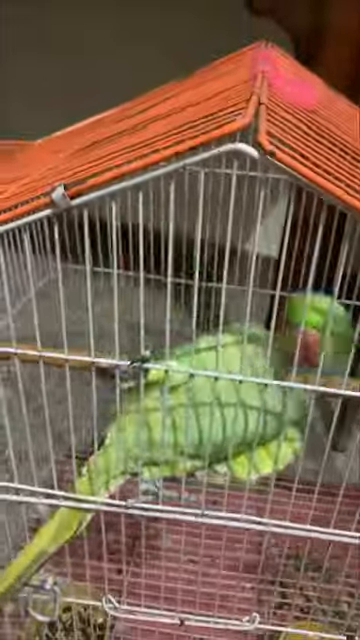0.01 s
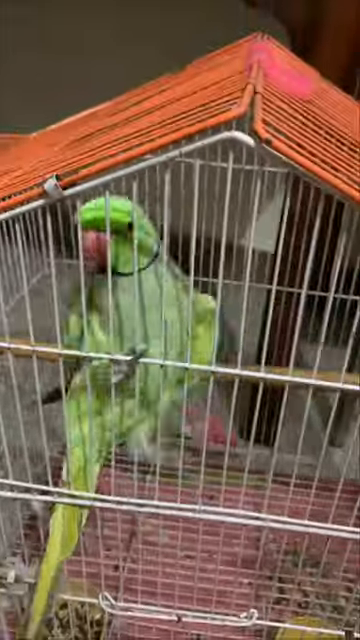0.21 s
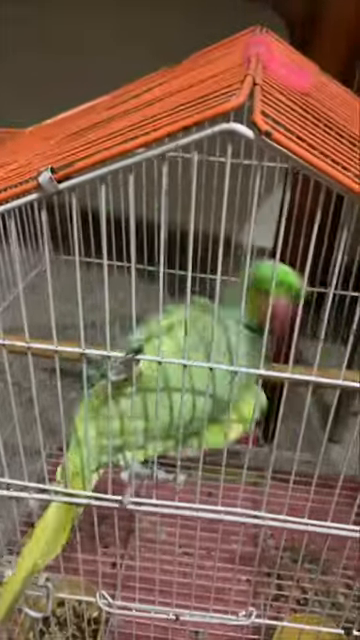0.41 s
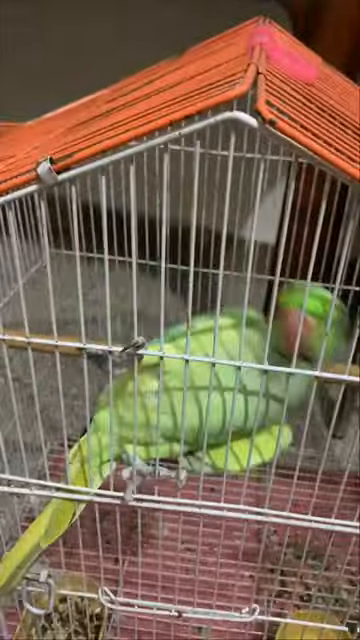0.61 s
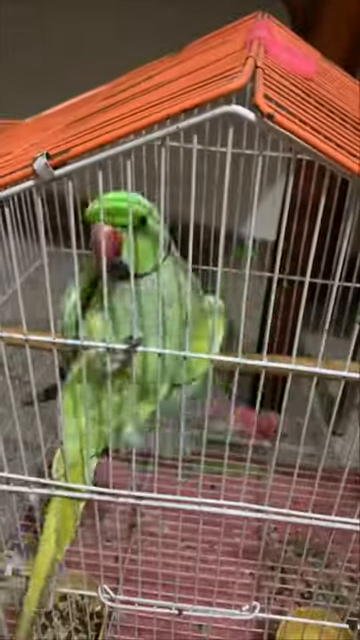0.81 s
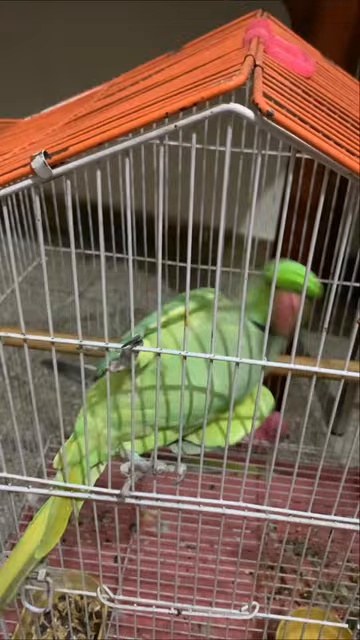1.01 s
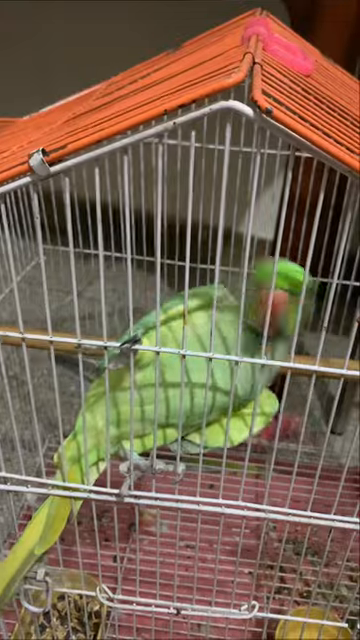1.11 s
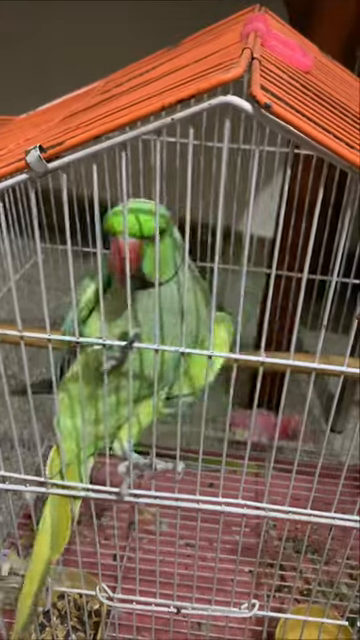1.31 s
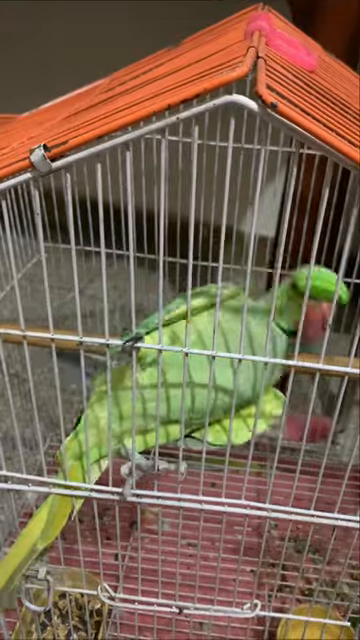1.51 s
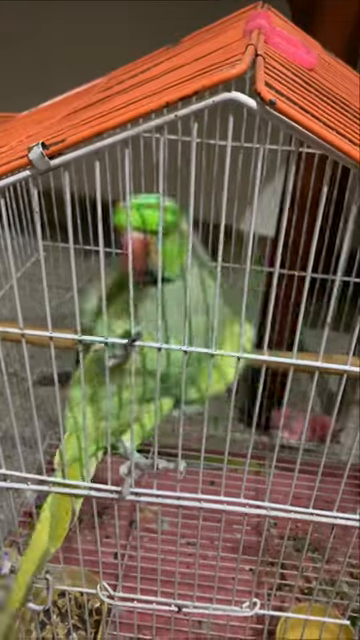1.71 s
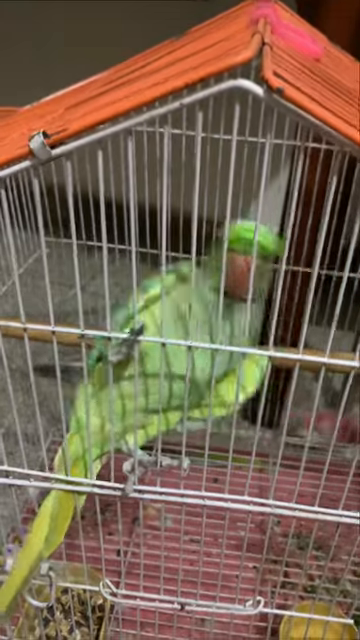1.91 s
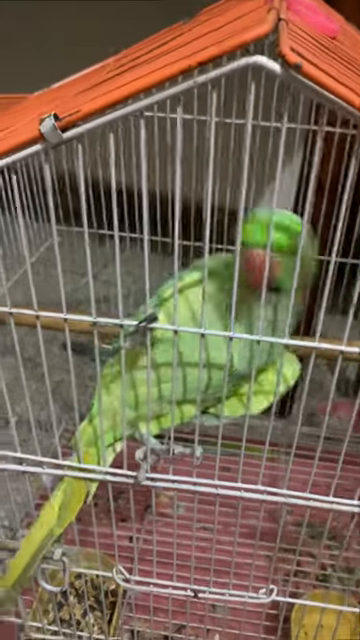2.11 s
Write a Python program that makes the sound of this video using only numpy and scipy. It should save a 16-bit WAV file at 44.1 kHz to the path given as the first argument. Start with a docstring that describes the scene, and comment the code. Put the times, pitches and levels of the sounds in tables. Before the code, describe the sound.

A parakeet gives four soft, breathy, high whistles between about 0.1 and 0.7 seconds over a low hum. The hum drops away as three sharp, close chirps follow at about 0.7, 1.2 and 1.6 seconds, each a quarter second long. Each follows a tiny rattle, starts harsh, then clears as its pitch rises and falls. One faint whistle comes at 1.1 seconds. The room rings briefly.

```python
"""Caged parakeet indoors.

A run of soft, breathy whistles, then three sharp arched chirps with one more whistle among them.
Each chirp follows a tiny rattle of pulses, starts harsh and clears into overtones shaped by the throat.
The room rings briefly; a low hum lies underneath and drops away as the first chirp begins."""
import sys
import numpy as np
from scipy import signal
from scipy.fft import rfft, irfft, next_fast_len
from scipy.io import wavfile
from scipy.ndimage import uniform_filter1d, minimum_filter1d, map_coordinates

SR = 44100
rng = np.random.default_rng(int(sys.argv[2]) if len(sys.argv) > 2 else 0)


def to_wav(sig):
    """Store sig (one row per channel, or 1-D mono) as 16-bit WAV at the path in sys.argv[1].

    Samples outside -1..1 are clipped; the rate is SR.
    """
    pcm = np.clip(np.atleast_2d(sig), -1, 1) * 32767
    pcm = np.round(pcm).astype(np.int16)
    wavfile.write(sys.argv[1], SR, pcm.T)  # frames by channels


N = 94815
T = np.arange(N) / SR
SIDES = np.array([[.5], [-.5]])  # left, right

# background levels: time_s, hum_db, hiss_db
BACKGROUND_LEVELS = [(0,-42.5,-58),(.68,-40.5,-54.5),(.77,-58,-73),(1.0,-58,-70.5),(1.5,-60.5,-69.5),(2.15,-61.5,-79.5)]
# spectra of the hum, its stereo spread and the faint hiss: freq_hz, gain_db
HUM_SPECTRUM = [(15, -54.5), (25, -34.5), (54, -9), (112, -9), (175, -9.5), (210, -3), (281, -2.5),
                (344, 0.5), (445, -10.5), (564, -14.5), (630, -22.5), (1010, -17.5), (1460, -20.5),
                (1790, -23.5), (2000, -48.5), (2600, -45.5), (4400, -120)]
HUM_SPREAD = [(60,-34),(300,-9),(600,-1.5),(1500,-3.5)]
AIR_SPECTRUM = [(1180, -25.5), (2000, -5), (2760, -8), (3580, -11.5), (4380, -17.5), (4970, -21),
                (6620, -19.5), (7970, -10), (9050, -20.5), (15000, -62)]
# tones relative to the hum noise: pitch_hz, level_db
HUM_TONES = [(64,-16),(144,-14.5),(345,-8.5)]
# hum balance: freq_hz, left_minus_right_db
HUM_BALANCE = [(50,2.5),(125,-3),(300,-1.5),(600,-6),(1300,-4)]
# lead-in flicks: start_s, length_s, from_hz, to_hz, level_db
WHISTLE_FLICKS = [(0.116,0.029,1975,2640,-45.5),(0.125,0.024,2089,2248,-37),(0.312,0.016,2300,3850,-42),(0.481,0.026,2780,3950,-42)]
# whistles: start_s, length_s, top_hz, top_fraction, rise_hz, fall_hz,
# start_db, mid_db, late_db, hiss_db, octave_db
WHISTLE_ARCHES = [(0.145,0.092,3130,0.39,600,900,-43.5,-50,-28.5,-52.5,-69),(0.326,0.095,2910,0.22,190,700,-27.5,-27.5,-32.5,-54.5,-65),(0.498,0.1,3109,0.49,380,800,-27.5,-35.5,-25,-51.5,-67),(0.649,0.092,3050,0.3,450,422,-31.5,-31,-40,-44,-72.5),(1.062,0.12,3098,0.63,300,206,-42.5,-40,-41.5,-58,-89.5)]
# breath in the whistles: freq_hz, gain_db
BREATH_SPECTRUM = [(2060,-14.5),(3500,-4),(4700,-5.5),(6470,-19.5),(9060,-12),(11900,-34.5),(14000,-58)]
# rattles: start_s, level_db, spacing_s
RATTLE_BURSTS = [(0.6588,5.5,0.0015),(0.7005,0.5,0.00078),(1.1219,-0.5,0.0017),(1.1567,-10,0.00068),(1.6057,-9.5,0.0014)]
# successive pulses of a rattle: gain_db
PULSE_GAINS_DB = [0.4, 5.3, 7.4, 1.3]
# rattle colour: freq_hz, gain_db
RATTLE_SPECTRUM = [(200,-44),(500,-14.5),(820,-10.5),(1200,-7.5),(2300,-5),(3600,-5),(4400,4.5),(5050,-5.5),(6200,-5.5),(7300,-18.5),(8300,-12),(9600,-8),(11200,-25),(13200,-28),(15500,-48.5)]
# chirp contours, relative levels: time_s, pitch_hz, low_db, treble_db
FIRST_CHIRP = [(.702,1378,-10,-20),(.712,1177,-13.5,-19.5),(.733,1209,-19,-23),(.742,1285,-15,-22.5),(.750,1405,-18.5,-30),(.761,1540,-17,-28.5),(.771,1568,-19,-26.5),(.786,1593,-24.5,-27),(.803,1630,-18,-24.5),(.818,1720,-15,-27),(.86,1769,-20,-30.5),(.898,1725,-17.5,-30.5),(.949,1615,-26,-31),(.961,1465,-28.5,-49.5),(.972,1153,-59.5,-64)]
SECOND_CHIRP = [(1.156,1232,-10.5,-17),(1.162,1185,-16.5,-19),(1.176,1372,-15.5,-17),(1.189,1502,-17,-35),
                (1.198,1600,-22.5,-27),(1.208,1618,-20.5,-20),(1.228,1672,-17.5,-25.5),(1.272,1792,-20.5,-30),(1.3,1819,-18.5,-30.5),
                (1.34,1806,-20.5,-37.5),(1.388,1755,-25.5,-36),(1.402,1668,-30,-43.5),(1.414,1380,-41.5,-61)]
THIRD_CHIRP = [(1.646,1360,-22,-30.5),(1.654,1231,-25,-32),(1.664,1412,-20,-27.5),(1.68,1594,-21.5,-26.5),
               (1.696,1640,-22.5,-23),(1.706,1662,-13,-19),(1.724,1706,-20.5,-27),(1.784,1820,-18,-30.5),
               (1.836,1750,-20,-31),(1.87,1658,-23.5,-32),(1.882,1596,-31,-36.5),(1.893,1252,-41.5,-82)]
# throat and beak response: freq_hz, gain_db
THROAT_RESPONSE = [(400,-51.5),(900,-24),(1150,-7.5),(1750,-16),(2050,-16.5),(2400,-6.5),(3100,1),(3900,3),(4400,1.5),(4700,-3.5),(5050,-23),(5450,-12),(6200,-10.5),(6800,-9),(7250,-22),(8000,-11.5),(9600,-12),(10900,-22.5),(11700,-60),(12600,-29),(13600,-30),(15500,-49.5)]
# early reflections: freq_hz, gain_db
EARLY_SPECTRUM = [(1700,0),(2100,-6),(3000,0),(3600,-1),(4200,-7),(5600,-8),(6600,-1),(10000,-1),(14000,-6)]
# room decay: freq_hz, t60_s
ROOM_DECAY = [(300,0.26),(1700,0.43),(2300,0.25),(2900,0.34),(3500,0.42),(4500,0.14),(5600,.25),(7000,0.43),(10000,0.23),(15000,0.055)]
# microphone port balance: freq_hz, left_minus_right_db
CHIRP_BALANCE = [(300,-9),(1250,-5.5),(1650,2.5),(2400,-8),(2700,-22),(3300,-7.5),(3600,-0.5),(3800,4),(4400,2),(5300,-5.5),(6200,0.5),(15000,-0.5)]
WHISTLE_BALANCE = [(2200,16.5),(2550,12.5),(2850,-5),(3100,-13),(3600,5.5),(6000,3)]
# microphone port phase: freq_hz, left_lead_rad
CHIRP_LEAD = [(100,0),(1300,.4),(1750,.1),(2800,-.5),(3350,-2.1),(3650,-2.7),(3900,-4.3),(4400,-4.1),(5300,-2.8),(7000,-1.05),(8500,0),(10900,1.9),(14500,5.0)]
WHISTLE_LEAD = [(2200,0.11),(2850,-1.2),(3600,.9),(4650,0),(7000,-.6),(9400,.2)]


def amp(db):
    """Decibels to gain."""
    return 10 ** (np.asarray(db) / 20)


def along(points, hz):
    """Interpolate (freq_hz, value) points on a log axis."""
    knots_hz, values = np.transpose(points)
    return np.interp(np.log(hz + 1), np.log(knots_hz + 1), values)


def curves(rows):
    """Per-sample curve of each column after time_s."""
    time_s, *columns = np.transpose(rows)
    return [np.interp(T, time_s, column) for column in columns]


def wobble(knots_per_s):
    """Smooth random curve."""
    return map_coordinates(rng.standard_normal(N // 8), [T * knots_per_s], mode="wrap")


def filtered(x, response):
    """Apply a complex frequency response."""
    size = next_fast_len(N + SR // 2)
    return irfft(rfft(x, size) * response(np.fft.rfftfreq(size, 1 / SR)), size)[..., :N]


def noise(spectrum):
    """Coloured noise, rms 1."""
    x = filtered(rng.standard_normal(N), lambda hz: amp(along(spectrum, hz)))
    return x / np.sqrt(np.mean(x ** 2) + 1e-20)


def minimum_phase(spectrum, hz):
    """Causal response with the given colour."""
    cepstrum = irfft(np.log(amp(along(spectrum, hz))))
    half = len(cepstrum) // 2
    return np.exp(rfft(np.r_[cepstrum[0], 2 * cepstrum[1:half], np.zeros(half)]))


def gate(start_s, end_s, attack_s, release_s):
    """On between two times, with linear edges."""
    return np.clip((T - start_s) / attack_s + .5, 0, 1) * np.clip((end_s - T) / release_s + .5, 0, 1)


def phase_of(hz):
    """Running phase of a pitch curve."""
    return 2 * np.pi * np.cumsum(hz) / SR


def background():
    """Low wavering hum, slightly right, and a faint hiss."""
    hum_db, hiss_db = curves(BACKGROUND_LEVELS)
    tones = np.zeros(N)
    for pitch_hz, level_db in HUM_TONES:
        level = np.sqrt(2) * amp(level_db + 5.3 * wobble(15))
        tones += level * np.sin(phase_of(pitch_hz * (1 + .025 * wobble(25))))
    spread = np.array([noise(HUM_SPECTRUM), noise(HUM_SPECTRUM)])
    spread = filtered(spread, lambda hz: amp(along(HUM_SPREAD, hz)))
    hum = filtered(noise(HUM_SPECTRUM) + tones + spread, lambda hz: amp(SIDES * along(HUM_BALANCE, hz)))
    hiss = np.array([noise(AIR_SPECTRUM), noise(AIR_SPECTRUM)])
    return amp(hum_db) * hum + amp(hiss_db) * hiss


def whistles(edge_s=.0071, flutter_db=1.7, jitter=.0027):
    """Nearly pure arches with a puff of breath; quick upward flicks lead into the first three."""
    out, breath = np.zeros(N), noise(BREATH_SPECTRUM)
    waver = 1 + jitter * wobble(1300)
    for start_s, length_s, from_hz, to_hz, level_db in WHISTLE_FLICKS:
        progress = np.clip((T - start_s) / length_s, 0, 1)
        phase = phase_of(waver * (from_hz + (to_hz - from_hz) * progress))
        out += np.sqrt(2) * amp(level_db) * np.sin(np.pi * progress) * np.sin(phase)
    for start_s, length_s, top_hz, top_fraction, rise_hz, fall_hz, *levels_db in WHISTLE_ARCHES:
        start_db, mid_db, late_db, hiss_db, octave_db = levels_db
        progress = np.clip((T - start_s) / length_s, 0, 1)
        before_top = np.clip(1 - progress / top_fraction, 0, 1)
        after_top = np.clip((progress - top_fraction) / (1 - top_fraction), 0, 1)
        pitch_hz = top_hz - rise_hz * before_top ** 2.7 - fall_hz * after_top ** 2.9
        phase = phase_of(pitch_hz * waver)
        level_db = np.interp(progress, [.1, .4, .6, .74, .84, 1],
                             [start_db, mid_db, mid_db, late_db, late_db, late_db - 13.5])
        level_db += flutter_db * wobble(51)
        tone = amp(level_db) * np.sin(phase) + amp(octave_db) * np.sin(2 * phase)
        out += np.sqrt(2) * gate(start_s, start_s + length_s, edge_s, edge_s) * tone
        out += amp(hiss_db) * np.sin(np.pi * progress) * breath
    return out


def rattles(puff_t60_s=.019, puff_db=1.5, scatter_s=.000095):
    """Bursts of four quick, uneven pulses, each a click plus a dying puff of noise."""
    pulses, t = np.zeros(N), T[:SR // 50]
    for start_s, level_db, spacing_s in RATTLE_BURSTS:
        for k, gain_db in enumerate(PULSE_GAINS_DB):
            puff = rng.standard_normal(len(t)) * amp(-60 * t / puff_t60_s)
            pulse = (t == 0) + amp(puff_db) * puff / np.linalg.norm(puff)
            at = round((start_s + k * spacing_s + scatter_s * rng.standard_normal()) * SR)
            pulses[at:at + len(t)] += amp(level_db + gain_db) * pulse
    return filtered(pulses, lambda hz: minimum_phase(RATTLE_SPECTRUM, hz))


def chirp(contour):
    """Overtones glide through fixed throat resonances; rough at both ends and in fast slides."""
    onset_s, closing_s, rough_slide_hz_per_s = .023, .02, 40000
    clear_jitter, rough_jitter, rasp_db, closing_dull_db = .0026, .017, -28, -9.5
    buzz_hz, buzz_depth, flutter_db = 370, .05, 1.44
    pitch_hz, low_db, treble_db = curves(contour)
    pitch_hz = uniform_filter1d(pitch_hz, size=200)
    start_s, end_s = contour[0][0], contour[-1][0]
    envelope = gate(start_s, end_s, attack_s=.0041, release_s=.009)

    onset = 1 / (1 + (np.abs(T - start_s) / onset_s) ** 4)
    slide = uniform_filter1d(np.abs(np.gradient(pitch_hz)) * SR / rough_slide_hz_per_s, size=300)
    closing = np.clip(1 - (end_s - T) / closing_s, 0, 1)
    roughness = np.minimum(onset + slide ** 2, 1) + 2 * closing
    waver = 1 + clear_jitter * wobble(450) + rough_jitter * roughness * wobble(1500)
    phase = phase_of(pitch_hz * waver)

    on = np.flatnonzero(envelope)
    order = np.arange(1, 13)[:, None]
    partial_hz = order * pitch_hz[on]
    throat = amp(along(THROAT_RESPONSE, partial_hz) + closing_dull_db * closing[on] * (order > 2))
    treble_share = along([(4800, 0), (5800, 1)], partial_hz)
    bands = [(low_db, throat * (1 - treble_share)), (treble_db, throat * treble_share)]
    gains = sum(amp(db[on]) * band / np.linalg.norm(band, axis=0) for db, band in bands)
    partials = np.sin(order * phase[on] + rng.uniform(0, 2 * np.pi, order.shape))
    voice = np.zeros(N)
    voice[on] = np.sqrt(2) * (gains * partials).sum(0)

    rasp = noise(THROAT_RESPONSE) * (1 + np.cos(phase)) * amp(low_db + rasp_db) * roughness
    buzz = 1 + buzz_depth * np.sin(2 * np.pi * buzz_hz * T)
    return (voice + rasp) * buzz * envelope * amp(flutter_db * wobble(84))


def reflect(x, impulse):
    """Mono through a stereo impulse response, after 2.5 ms."""
    delayed = np.pad(x, (SR // 400, 0))[None]
    return signal.fftconvolve(delayed, impulse / np.linalg.norm(impulse[0]), axes=1)[:, :N]


def room(early_send, tail_send, early_db=-13.5, early_tau_s=.018, tail_db=-20.5):
    """Near surfaces answer at once; the tail's decay time varies with frequency."""
    freq_hz, time_s, frames = signal.stft(rng.standard_normal((2, SR)), SR, nperseg=256)
    decay = amp(-60 * time_s / along(ROOM_DECAY, freq_hz)[:, None])
    tail = signal.istft(frames * decay, SR, nperseg=256)[1]
    early = rng.standard_normal(tail.shape) * np.exp(-T[:tail.shape[1]] / early_tau_s)
    near = filtered(reflect(early_send, early), lambda hz: minimum_phase(EARLY_SPECTRUM, hz))
    return amp(early_db) * near + amp(tail_db) * reflect(tail_send, tail)


def ports(x, balance, lead):
    """Sound reaches the two microphone ports with different colour and phase."""
    def response(hz):
        gain = amp(SIDES * along(balance, hz))
        gain /= np.sqrt(np.mean(gain ** 2, axis=0))
        return gain * np.exp(1j * SIDES * along(lead, hz))
    return filtered(x, response)


def scene():
    """Near chirps and rattles, softer whistles with more room, and the background."""
    chirps = amp(2) * (chirp(FIRST_CHIRP) + chirp(SECOND_CHIRP) + chirp(THIRD_CHIRP))
    rattle, whistle = rattles(), whistles()
    direct = ports(chirps + rattle, CHIRP_BALANCE, CHIRP_LEAD)
    direct += ports(whistle, WHISTLE_BALANCE, WHISTLE_LEAD)
    calls = chirps + amp(2.5) * rattle
    reverb = room(early_send=calls + amp(6) * whistle, tail_send=calls + amp(12.5) * whistle)
    return direct + reverb + background()


def record(dry):
    """Fast peak limiter, then a brick-wall low-pass."""
    ceiling, hold_s, cutoff_hz = .88, .004, 16000
    hold = round(hold_s * SR)
    needed = ceiling / np.maximum(np.abs(dry).max(0), ceiling)
    gain = uniform_filter1d(minimum_filter1d(needed, hold), hold)
    return filtered(dry * gain, lambda hz: hz < cutoff_hz)


dry = scene()
out = record(dry)
to_wav(out)
```